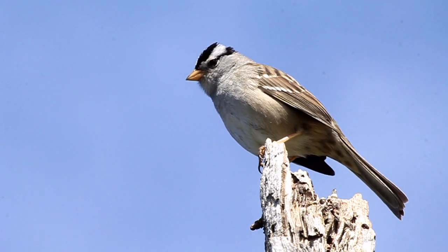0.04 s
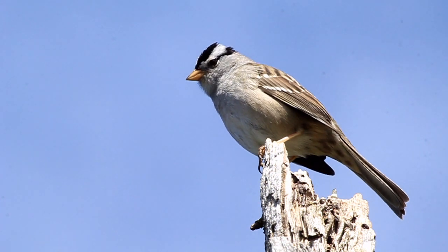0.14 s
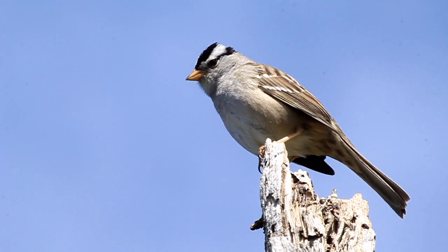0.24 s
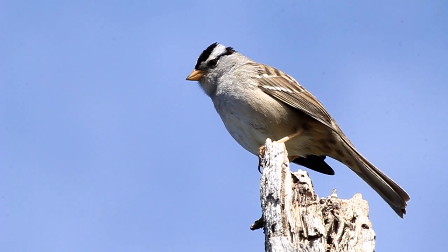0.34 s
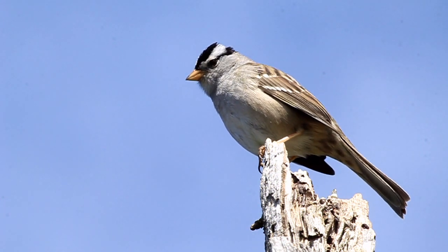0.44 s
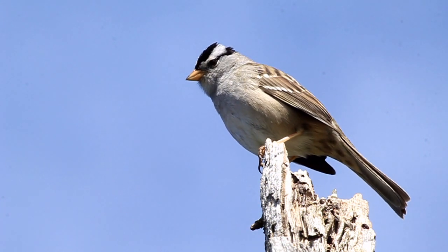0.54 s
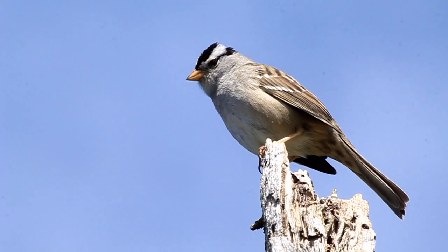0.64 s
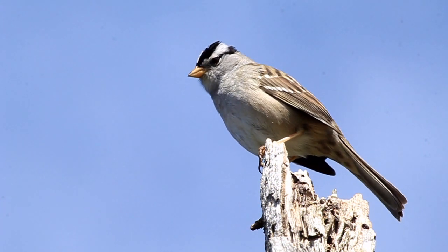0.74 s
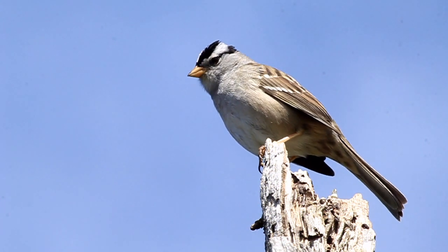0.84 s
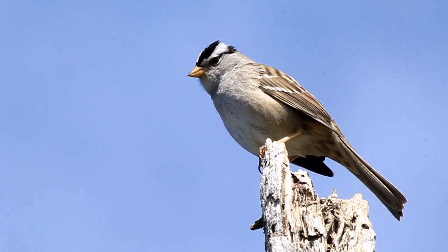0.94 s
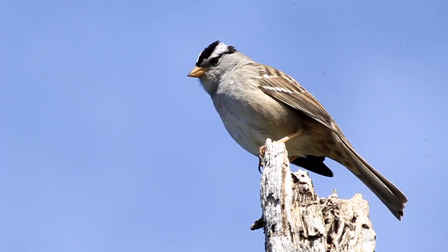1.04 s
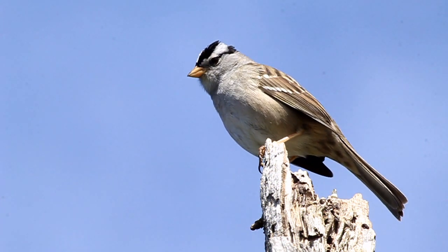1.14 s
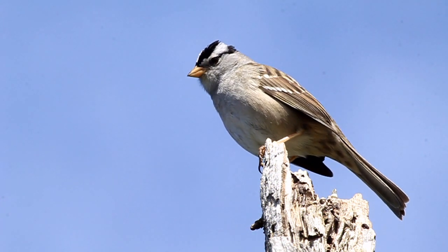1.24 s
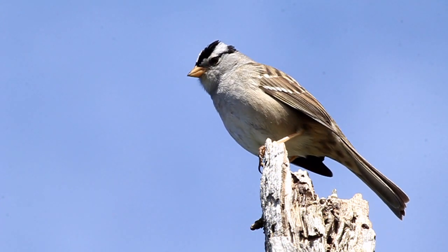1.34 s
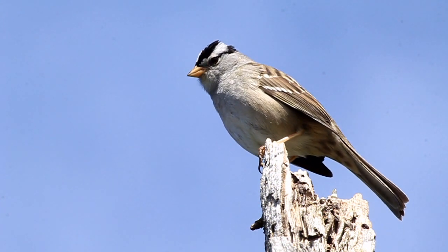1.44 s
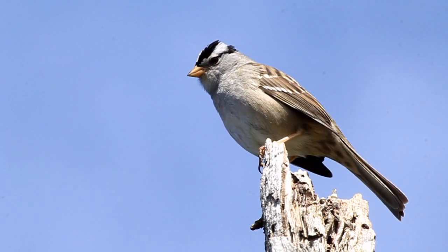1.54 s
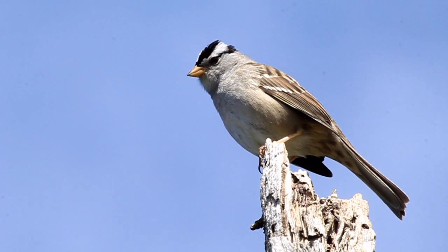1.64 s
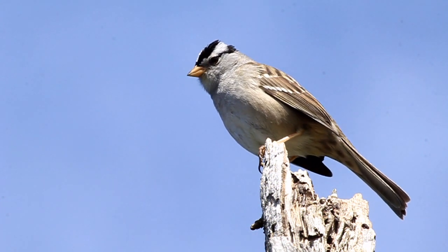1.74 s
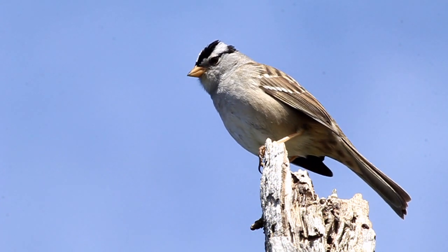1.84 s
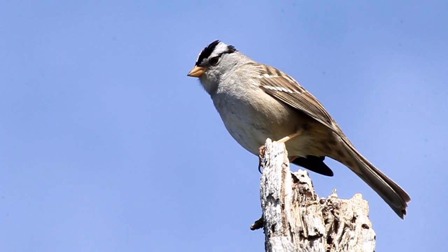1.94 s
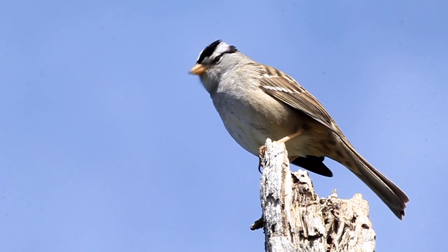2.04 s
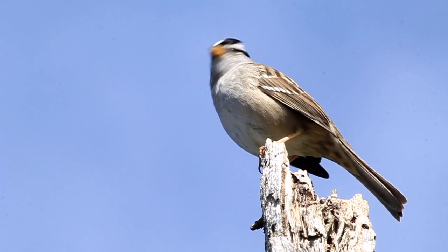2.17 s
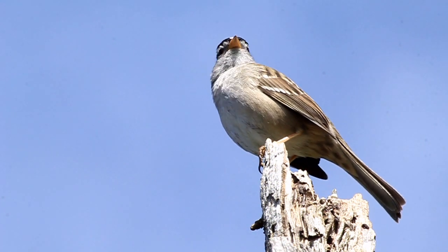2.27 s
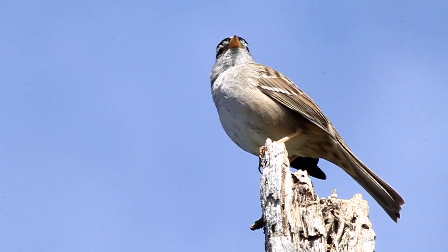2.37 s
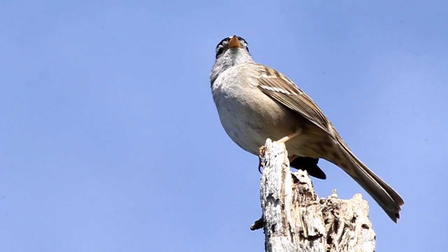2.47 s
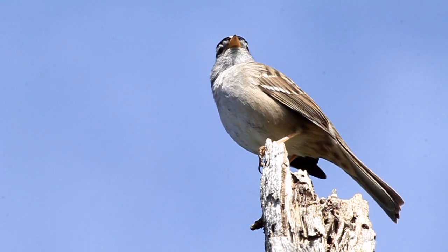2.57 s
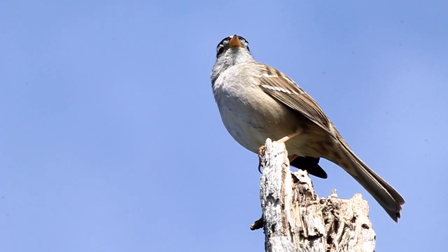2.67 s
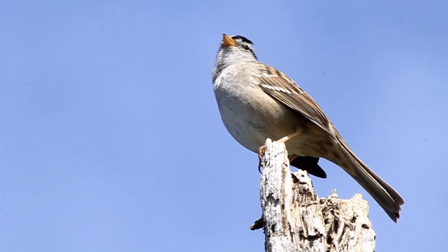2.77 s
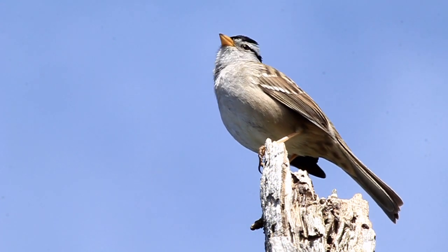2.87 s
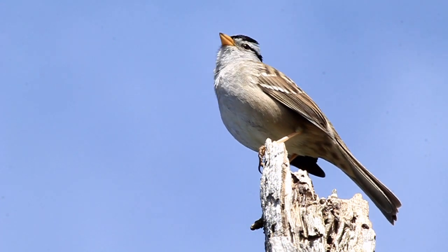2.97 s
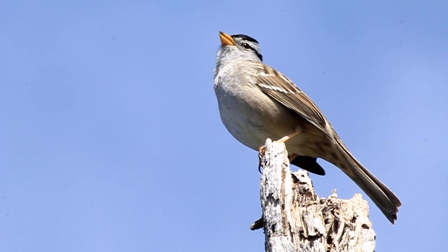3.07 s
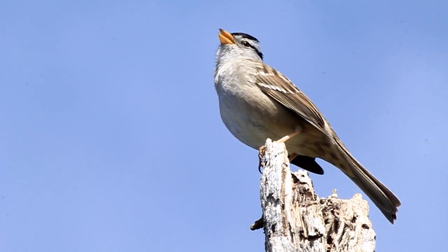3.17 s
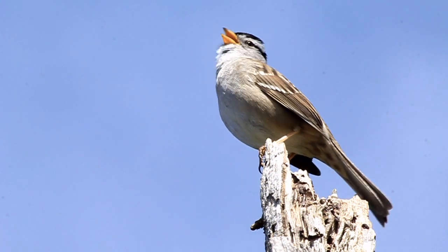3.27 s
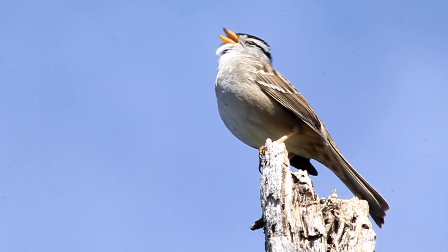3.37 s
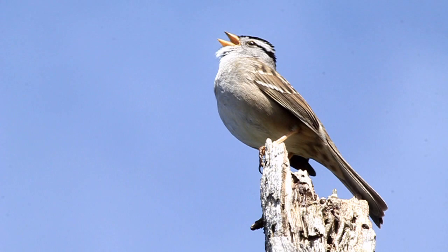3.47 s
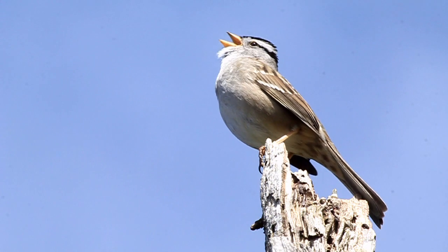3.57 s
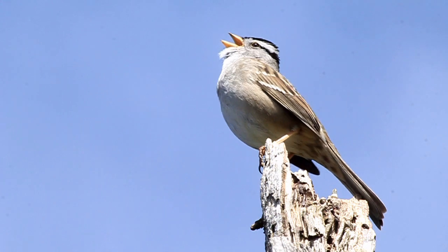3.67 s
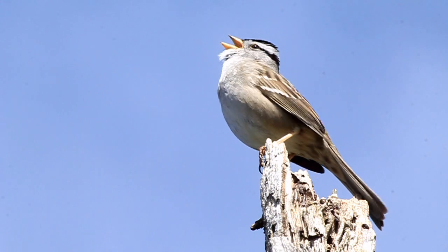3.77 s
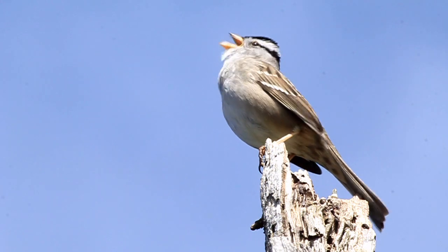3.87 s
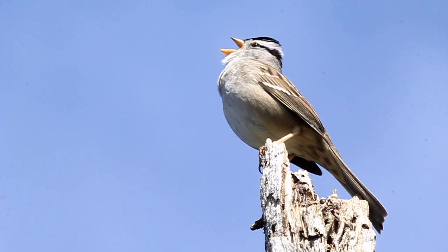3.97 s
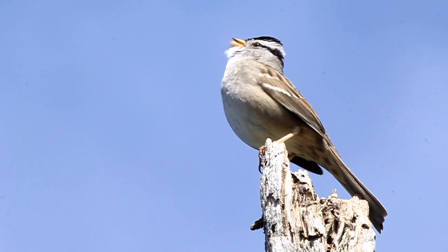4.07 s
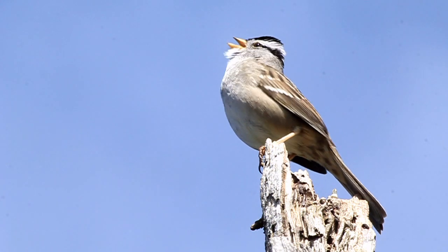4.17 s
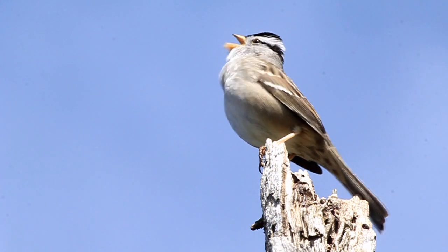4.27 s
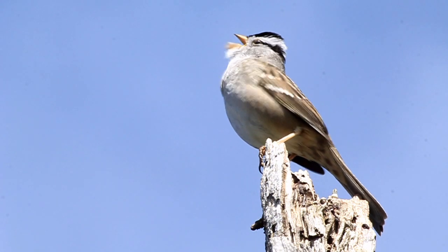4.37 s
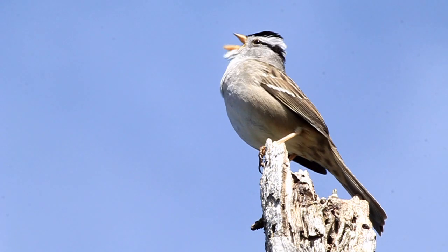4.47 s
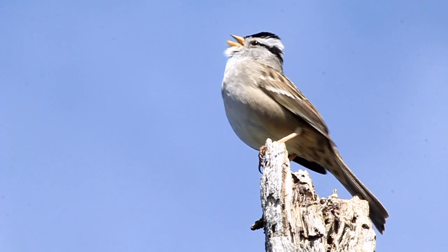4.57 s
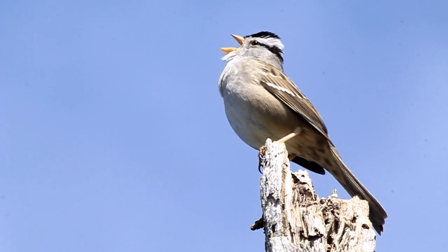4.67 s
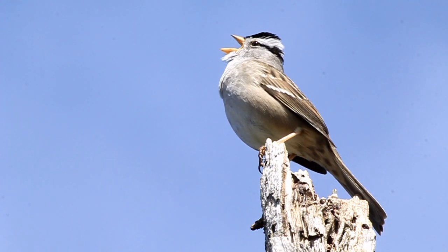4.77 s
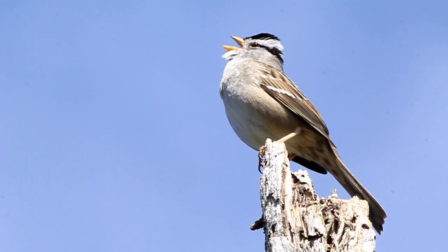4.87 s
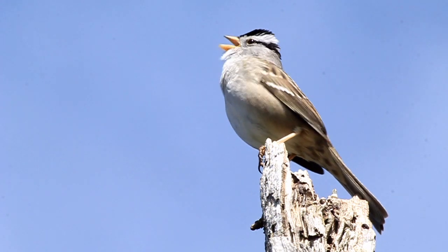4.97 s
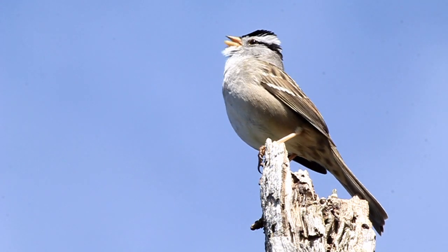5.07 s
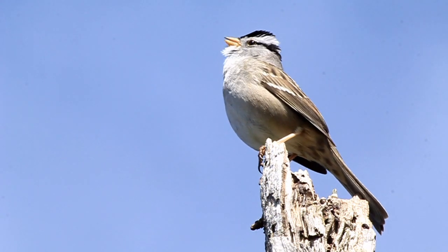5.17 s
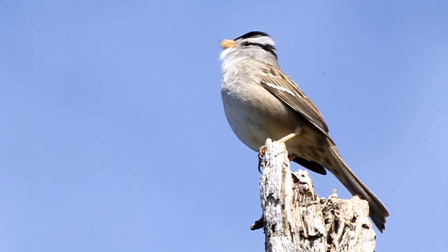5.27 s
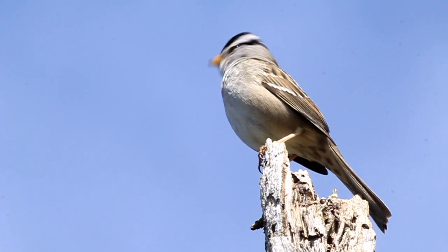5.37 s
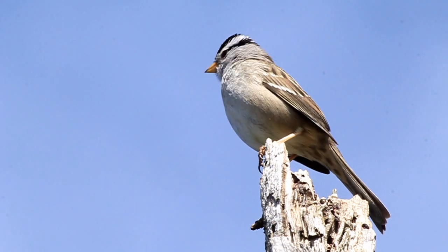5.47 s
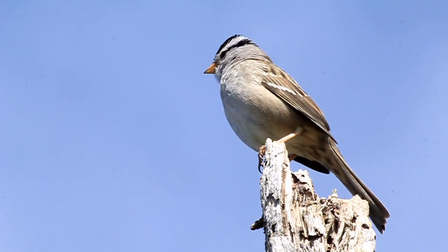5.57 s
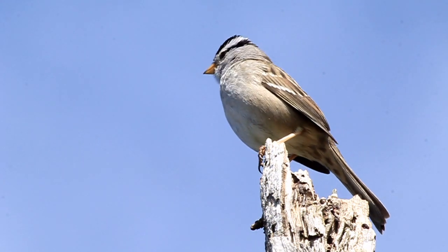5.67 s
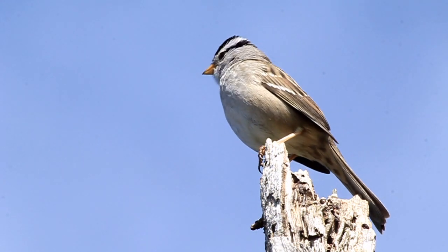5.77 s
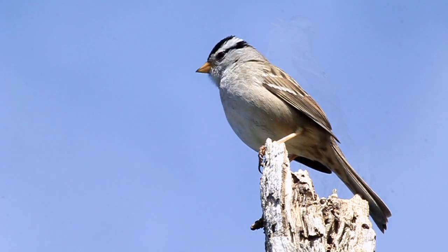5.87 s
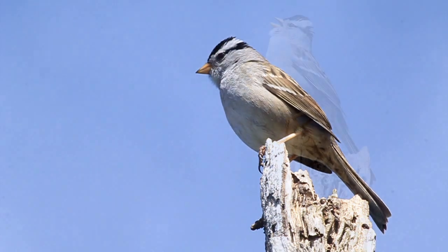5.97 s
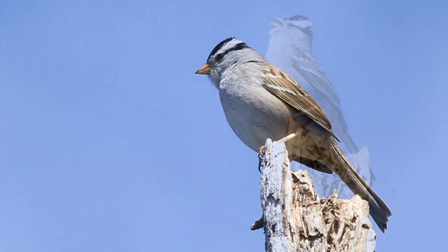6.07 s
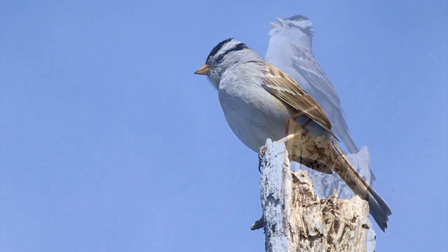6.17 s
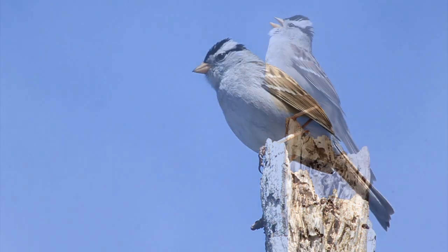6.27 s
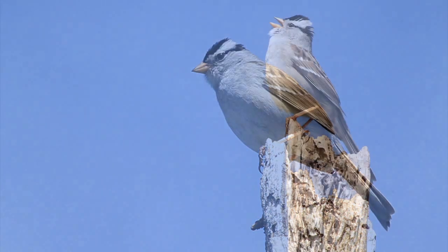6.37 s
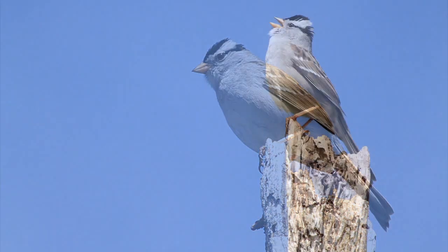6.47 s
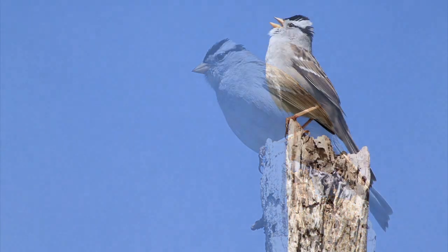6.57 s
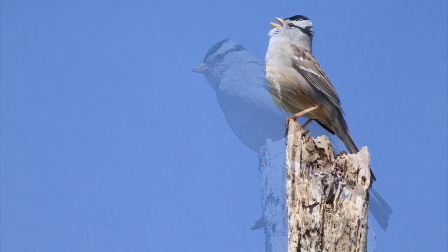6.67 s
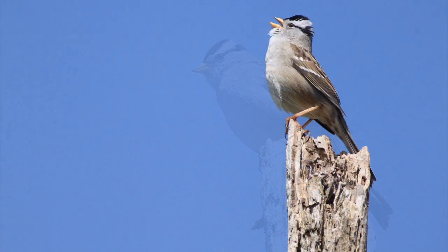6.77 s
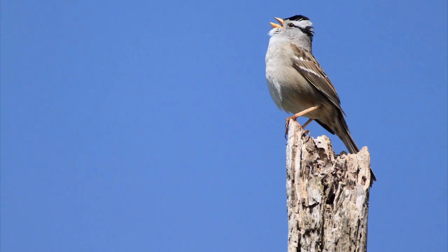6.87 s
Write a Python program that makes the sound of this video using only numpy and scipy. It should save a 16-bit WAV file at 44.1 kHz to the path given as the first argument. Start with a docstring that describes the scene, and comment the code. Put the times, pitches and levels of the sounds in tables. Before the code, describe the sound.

A quiet open-air background of low rumble, even hiss and faraway birdsong comes first. Then one white-crowned sparrow, clear and centred, gives a two-second song: a pure sharp whistle, rapid bending notes with little rattles, a sinking raspy buzz and a long falling whistle. It stops, leaving soft distant whistles and chirps, blurred by the scrub. The close bird is much louder than everything else.

```python
"""Sparrow song in open scrub

A sparrow sings one song: a held whistle, slurs linked by trills, a buzz and a long falling note.
Its voice is a gliding sine with weak overtones, shaped by resonances of throat and beak; fast strokes
add rasping noise. Fainter whistles, slurs, arches, buzzes and random chirps come from farther birds.
Decaying noise echoes scatter every note; filtered noise and a wavering sine make a low outdoor
rumble, and brighter filtered noise a soft, even hiss."""
import sys
import numpy as np
from scipy import signal
from scipy.fft import rfft, irfft, next_fast_len
from scipy.io import wavfile
from scipy.ndimage import uniform_filter1d, map_coordinates

SR = 44100
rng = np.random.default_rng(int(sys.argv[2]) if len(sys.argv) > 2 else 0)


def unload_audio(sound):
    """Save the sound as a 16-bit wav file, at the path given as the first command line argument."""
    columns = np.transpose(np.atleast_2d(sound))
    # keep every value between -1 and 1, then stretch to whole-number steps
    steps = np.round(np.clip(columns, -1, 1) * 32767)
    wavfile.write(sys.argv[1], SR, steps.astype(np.int16))


N = 305157  # samples in the scene


def amp(db):
    """Logarithmic level: decibels to amplitude gain."""
    return 10 ** (np.asarray(db) / 20)


def unit(x):
    """Normalization: scale to an rms of 1."""
    return x / np.sqrt(np.mean(x ** 2) + 1e-20)


def along(points, hz):
    """Logarithmic frequency scale: (frequency [Hz], value) points are joined along it."""
    f, v = np.transpose(points)
    return np.interp(np.log(hz + 1), np.log(f + 1), v)


def wobble(rate, size):
    """Band-limited fluctuation: a smooth curve through `rate` random knots a second."""
    knots = rng.standard_normal(int(size * rate / SR) + 4)
    return map_coordinates(knots, [np.arange(size) * rate / SR])


def span(length):
    """Normalized time: a note of `length` seconds runs from -1 to 1."""
    return np.linspace(-1, 1, int(length * SR))


def gesture(rows, size=90):
    """Smooth motor control: start time and gently rounded per-sample curves of a note's columns."""
    s, *cols = np.transpose(rows)
    s = np.sort(s)
    t = s[0] + np.arange(max(int((s[-1] - s[0]) * SR), size)) / SR
    curves = [uniform_filter1d(np.interp(t, s, c), size, mode="nearest") for c in cols]
    return s[0], curves


def gate(size, attack, release):
    """Amplitude envelope: straight attack, hold and straight release."""
    t = np.arange(size) / SR
    return np.minimum(t / attack, 1) * np.minimum(t[::-1] / release, 1)


def level(rows):
    """Level contour: gain over the whole scene from (time [s], level [dB]) rows."""
    return amp(np.interp(np.arange(N) / SR, *np.transpose(rows)))


def add(track, s, sound):
    """Superposition: mix a sound into the track at time s."""
    at = round(s * SR) + np.arange(len(sound))
    inside = (at >= 0) & (at < N)
    track[at[inside]] += sound[inside]


def filtered(x, response):
    """Linear filtering: the spectrum of x is multiplied by a response of frequency."""
    m = next_fast_len(N + SR // 2)
    return irfft(rfft(x, m) * response(np.fft.rfftfreq(m, 1 / SR)), m)[..., :N]


def noise(spectrum):
    """Spectral shaping: white noise coloured by (frequency [Hz], level [dB]) rows, at rms 1."""
    return unit(filtered(rng.standard_normal(N), lambda hz: amp(along(spectrum, hz))))


# Spectral shape of the low outdoor rumble: (frequency [Hz], relative level [dB])
RUMBLE_SPECTRUM = [(15, -41), (25, -13.5), (70, -9), (122, -1), (174, -5.5), (208, -9.5), (244, -9.5),
                   (414, -14), (477, -14), (667, -17), (716, -16), (1450, -27), (1700, -33), (2210, -44.5),
                   (3740, -120)]
# Level of the rumble, which dips briefly: (time [s], level [dB])
RUMBLE_LEVEL = [(0, -49), (3.8, -49.5), (4.7, -51.5), (5.2, -48.5), (6.85, -48.5)]
# Level of the drone in the rumble before its trim: (time [s], relative level [dB])
DRONE_LEVEL = [(0, -49), (.5, -43), (1.7, -40.5), (2.4, -48), (6.8, -45)]


def rumble(drone_trim_db=-7, side_db=-14, lean_db=.45):
    """Partial interchannel coherence: a weak side noise widens the rumble; it leans to the left."""
    wander = 3.4 * wobble(8, size=N)  # phase [rad]
    drone = np.sqrt(2) * np.sin(2 * np.pi * 82.5 * np.arange(N) / SR + wander)
    mid = level(RUMBLE_LEVEL) * noise(RUMBLE_SPECTRUM)
    mid = mid + amp(drone_trim_db) * level(DRONE_LEVEL) * drone
    side = amp(side_db) * level(RUMBLE_LEVEL) * noise(RUMBLE_SPECTRUM)
    return np.array([amp(lean_db) * (mid + side), amp(-lean_db) * (mid - side)])


# Spectral shape of the hiss: (frequency [Hz], relative level [dB])
HISS_SPECTRUM = [(700, -23), (1300, -5), (1900, 0), (3000, -4.5), (4500, -1.5), (6500, -5.5), (12600, -8.5),
                 (13200, -15), (13700, -49)]


def hiss(db=-58.5):
    """Stationary random noise: one steady signal, equal in both channels, heard in the middle."""
    return amp(db) * noise(HISS_SPECTRUM)


# Reverberation of the wider scrub: (frequency [Hz], time to decay by 60 dB [s])
SCRUB_DECAY = [(2000, 0.99), (4000, 0.89), (8000, 0.08), (15000, 0.043)]
# Colour of what the scrub returns: (frequency [Hz], gain [dB])
SCRUB_COLOUR = [(1800, -7), (3300, -3), (4600, 2), (6500, 0), (14000, -1)]


def scrub(x, early_db, late_db, early_t60=.16):
    """Diffuse scattering: nearby twigs return a quick scatter, the wider scrub a thin, long tail."""
    hz, t, z = signal.stft(rng.standard_normal(SR), SR, nperseg=256)
    decay = amp(-60 * t / along(SCRUB_DECAY, hz)[:, None])
    late = signal.istft(z * decay, SR, nperseg=256)[1][:SR]
    early = rng.standard_normal(SR) * amp(-60 * np.arange(SR) / SR / early_t60)
    # each part has unit energy before its level is set
    echo = amp(early_db) * early / np.linalg.norm(early)
    echo = echo + amp(late_db) * late / np.linalg.norm(late)
    scattered = signal.fftconvolve(x, echo)[:N]
    return x + filtered(scattered, lambda f: amp(along(SCRUB_COLOUR, f)))


# Transmission of an overtone through throat and beak: (frequency [Hz], gain [dB])
BEAK_PASS = [(4500, -23), (7500, -33), (9500, -40.5), (11500, -31), (13000, -26.5), (14400, -22.5),
             (15000, -24), (15500, -50)]


def syrinx(hz, db, jitter=0, bright_db=0, effort=0.037):
    """Source and filter: a nearly pure sine; overtones grow with loudness, coloured by the beak."""
    hz = hz * (1 + (.0006 + jitter) * wobble(1200, size=len(hz)))
    phase = 2 * np.pi * np.cumsum(hz) / SR
    overtone_db = bright_db + effort * (db + 13)
    tone = np.sin(phase)
    for k in range(2, 5):
        passed_db = along(BEAK_PASS, k * hz) - 13 * (k > 3) - 30 * (k * hz > 15200)
        below_nyquist = k * hz < SR / 2
        tone = tone + amp(overtone_db + passed_db) * below_nyquist * np.sin(k * phase)
    edges = signal.windows.tukey(len(hz), min(1, .004 * SR / len(hz)))  # 2 ms at each end
    unsteady_db = db + .15 * wobble(200, size=len(hz))
    return np.sqrt(2) * tone * edges * amp(unsteady_db)


# The throat's resonance during fast strokes: (frequency [Hz], gain [dB])
THROAT_RESONANCE = [(3000, -9.5), (4000, -2.5), (4650, 0.5), (5400, -2.5), (7500, -18)]


def strokes(hz, db, swing, cycles, rising, dip_db, bright_db=3, jitter=0.01):
    """Fixed resonance, swept source: a sawtooth pitch too fast for the throat flares as it crosses."""
    rising = np.clip(rising, .05, .95)
    saw = -signal.sawtooth(2 * np.pi * cycles, 1 - rising)
    swept = hz + swing * uniform_filter1d(saw, size=14) / 2
    loudest = (1 - rising) / 2 if rising < .5 else 1 - rising / 2  # midway along the longer sweep
    dip = dip_db * np.sin(np.pi * (cycles - loudest)) ** 2
    dip = dip + along(THROAT_RESONANCE, hz) - along(THROAT_RESONANCE, swept)
    # off the resonance the fundamental fades more than its overtones do
    return syrinx(swept, db - dip, jitter, bright_db + dip / 2)


BUZZ_STROKES_PER_S, BUZZ_SLOWING_PER_S2 = 129, 62  # first stroke rate and its loss per second


def buzz(hz, db, swing, rising=0.91, dip_db=10.0, uneven_db=0.65, lead=0.87, rasp=0.014):
    """Frequency modulation: slowing, raspy upward sweeps, uneven in width, strength and timing."""
    n = len(hz)
    rate = BUZZ_STROKES_PER_S - BUZZ_SLOWING_PER_S2 * np.arange(n) / SR
    db = db + uneven_db * wobble(110, size=n)
    swing = swing * np.exp(.15 * wobble(300, size=n))
    cycles = lead + np.cumsum(rate) / SR + .03 * wobble(90, size=n)
    return strokes(hz, db, swing, cycles, rising, dip_db, bright_db=-1.5, jitter=rasp)


# Level of a chirp in the faintest chorus before the mix: (time [s], relative level [dB])
CHORUS_LEVEL = [(0, -71), (1.5, -59), (3.2, -57), (5.3, -56), (6.85, -54)]


def chorus(count=120, pitch_hz=3050, spread=.22):
    """Random superposition: short slurs, mostly falling, from birds at the edge of hearing."""
    chirps = np.zeros(N)
    for i, (late, long, high, slope) in enumerate(rng.standard_normal((count, 4))):
        u = span(.05 * np.exp(.25 * long))
        glide = .2 * np.sign(slope - .6) * u
        hz = pitch_hz * np.exp(spread * np.clip(high, -1.3, 1.5) + glide)
        add(chirps, (i + late) * N / SR / count, syrinx(hz, -12 * u ** 2))
    return chirps * level(CHORUS_LEVEL)


# Buzzes of the farther birds before the mix:
# (start [s], length [s], start pitch [Hz], end pitch [Hz], relative level [dB])
DISTANT_BUZZES = [(1.678, 0.26, 5560, 4384, -58), (6.355, .08, 7600, 7900, -59)]


def far_buzzes(swing_hz=1000):
    """Frequency modulation with shallow dips: gliding buzzes, their strokes blurred by distance."""
    songs = np.zeros(N)
    for s, length, start_hz, end_hz, db in DISTANT_BUZZES:
        hz = np.linspace(start_hz, end_hz, int(length * SR))
        add(songs, s, buzz(hz, db, swing_hz, dip_db=5, uneven_db=2.2, rasp=.035))
    return songs


def far_note(hz, db, edge_db=10, flutter_db=3.0):
    """Propagation fluctuation: a note soft at both ends flutters on its way through the air."""
    u = np.linspace(-1, 1, len(hz))
    return syrinx(hz, db - edge_db * u ** 4 + flutter_db * wobble(40, size=len(u)))


# Slurs of the farther birds before the mix:
# (start [s], length [s], start pitch [Hz], end pitch [Hz], relative level [dB])
DISTANT_SLURS = [ (0.496, 0.11, 5270, 4170, -55), (0.715, .078, 3360, 3670, -55.5),
                 (0.865, 0.059, 5800, 4070, -52), (0.892, 0.059, 4490, 3370, -44),
                 (1.01, .075, 6000, 4650, -51.5), (1.062, .075, 4820, 4140, -47.5),
                 (1.063, 0.071, 4830, 3060, -56), (1.147, 0.087, 2880, 3500, -48),
                 (1.202, 0.064, 5650, 3900, -56.5), (1.312, 0.093, 5820, 3550, -46.5),
                 (1.439, .057, 3190, 4760, -46), (1.536, .075, 4880, 3325, -44),
                 (1.61, 0.047, 4300, 3220, -65), (2.052, .13, 4210, 3070, -47),
                 (2.147, .11, 3250, 2600, -53.5), (2.399, 0.1, 4090, 2820, -51),
                 (2.498, .08, 2340, 1790, -59), (2.526, 0.073, 3150, 2170, -62),
                 (2.653, 0.14, 2735, 1770, -57), (2.805, .16, 3330, 1833, -54.5),
                 (3.058, .066, 2505, 1910, -52), (3.226, .044, 2410, 1905, -54),
                 (3.691, 0.036, 2970, 1960, -53.5), (5.255, .046, 5370, 4300, -57),
                 (5.58, 0.089, 5480, 3750, -57.5), (5.775, .075, 4540, 3300, -57),
                 (6.19, .065, 5600, 3610, -50.5), (6.239, .11, 4170, 2825, -53),
                 (6.526, 0.053, 5800, 3750, -48), (6.648, 0.022, 3370, 4400, -48.5),
                 (6.706, .08, 5300, 3060, -49), (6.768, 0.039, 2850, 2220, -59.5), ]
FAR_SAG = .11  # a slur sags below the straight glide by this share of its span
FAR_DULL_DB_PER_HZ = 0.0082  # the high end of a distant slur arrives weaker


def far_slurs():
    """Parabolic glide and high-frequency loss: sagging slurs, weaker at their high end."""
    songs = np.zeros(N)
    for s, length, start_hz, end_hz, db in DISTANT_SLURS:
        u = span(length)
        sag = FAR_SAG * abs(end_hz - start_hz) * (1 - u ** 2)
        hz = np.linspace(start_hz, end_hz, len(u)) - sag
        add(songs, s, far_note(hz, db - FAR_DULL_DB_PER_HZ * (hz - hz.mean())))
    return songs


# Little arched notes of the farther birds before the mix:
# (start [s], top pitch [Hz], relative level [dB])
DISTANT_ARCHES = [(2.26, 3730, -64), (2.663, 4040, -60.5), (3.0, 2690, -55), (3.01, 3450, -64.5),
                  (3.16, 2610, -56.5), (5.72, 5060, -62.5)]


def far_arches(length=0.056, drop_hz=500):
    """Parabolic glide: each little note rises to its top pitch and falls back."""
    songs = np.zeros(N)
    for s, top_hz, db in DISTANT_ARCHES:
        add(songs, s, far_note(top_hz - drop_hz * span(length) ** 2, db))
    return songs


# Whistles of the farther birds:
# (start [s], loudest moment [s], end [s], start pitch [Hz], end pitch [Hz], level [dB])
DISTANT_WHISTLES = [(0, 0.636, .79, 4050, 3855, -40.5), (5.479, 5.83, 6.17, 4260, 4210, -51),
                    (6.151, 6.374, 6.6, 3600, 3645, -50.5)]
FAR_SWELL_DB = 29  # fade over a time equal to the note's length, either side of its loudest moment


def far_whistles(waver_hz=18):
    """Exponential swell and decay: held notes drift slightly in pitch while they swell and fade."""
    songs = np.zeros(N)
    for s, loudest, end, start_hz, end_hz, db in DISTANT_WHISTLES:
        t = np.arange(s, end, 1 / SR)
        hz = np.linspace(start_hz, end_hz, len(t)) + waver_hz * wobble(22, size=len(t))
        swell_db = db - FAR_SWELL_DB * np.abs(t - loudest) / (end - s)
        add(songs, s, far_note(hz, swell_db, edge_db=0.5, flutter_db=1.85))
    return songs


# Swells of the held whistle: (start [s], depth it starts from [dB], recovery time constant [s])
WHISTLE_SWELLS = [(3.217, 43.5, 0.071), (3.377, 14, .08), (3.544, 12.5, .045)]
WHISTLE_END_S, WHISTLE_HZ, WHISTLE_DB = 3.782, 3826, -14.5
SHARP_HZ, SETTLE_S = 327, .085  # the whistle starts sharp and settles on its pitch
FLAT_HZ_PER_DB = 5.5  # it goes a little flat as it swells
EASE_S, RELEASE_S = 0.016, 0.0049  # the bird eases off before each new swell; the final cut-off


def whistle(waver_hz=7):
    """Exponential relaxation: a held note swells three times, each towards the same full level."""
    start = WHISTLE_SWELLS[0][0]
    t = np.arange(start, WHISTLE_END_S, 1 / SR)
    slack_db = np.zeros(len(t))
    for s, depth, recover in WHISTLE_SWELLS:
        ease = np.clip(1 + (t - s) / EASE_S, 0, 1)
        slack_db += depth * ease * np.exp(-np.maximum(t - s, 0) / recover)
    hz = WHISTLE_HZ + SHARP_HZ * np.exp((start - t) / SETTLE_S) + FLAT_HZ_PER_DB * slack_db
    hz = hz + waver_hz * wobble(45, size=len(t))
    tone = syrinx(hz, WHISTLE_DB - slack_db, bright_db=-2.5, effort=.2)
    note = np.zeros(N)
    add(note, start, gate(len(t), EASE_S, RELEASE_S) * tone)
    return note


# The voice carries best at the throat's resonance: (pitch [Hz], level [dB])
SLUR_RESONANCE = [(2040, -46), (2250, -39.5), (2550, -34.5), (2780, -29.5), (3030, -28.5), (3350, -20),
                  (3600, -17.5), (4150, -16), (4420, -10.3), (4560, -10), (4800, -19), (5150, -14),
                  (5900, -24), (7000, -37)]


def slur(strength_db, attack, release, pitch):
    """Resonant amplification: a glide flares whenever it crosses the throat's resonance."""
    s, (hz,) = gesture(pitch)
    tone = syrinx(hz, strength_db + along(SLUR_RESONANCE, hz), bright_db=0.1, effort=0.059)
    return s, gate(len(hz), attack, release) * tone


# The sparrow's slurs, in order: a droop, a deep swoop up to a level tone, a fall, a flick out of
# a trill, an arch, a flick out of the last trill, the long closing fall:
# (strength [dB], attack [s], release [s], pitch curve of (time [s], pitch [Hz]))
SPARROW_SLURS = [ (-0.5, 0.022, 0.021, [(3.883, 3540), (3.895, 3513), (3.907, 3435), (3.937, 2620)]),
                 (-0.5, .003, 0.0012, [(3.966, 6920), (3.99, 5010), (4.006, 4430), (4.045, 3626),
                 (4.07, 2900), (4.087, 2633), (4.125, 3334), (4.155, 3576), (4.208, 3600)]),
                 (-1, 0.022, .012, [(4.288, 5280), (4.307, 4994), (4.329, 4460), (4.343, 4250),
                 (4.376, 3280)]), (-5, 0.0023, .003, [(4.397, 6550), (4.402, 4370), (4.409, 4260),
                 (4.414, 4300)]), (-2, 0.0091, 0.0028, [(4.41, 3075), (4.425, 3166), (4.463, 4510),
                 (4.473, 4860), (4.488, 4730), (4.523, 4170), (4.542, 3700), (4.57, 3240)]),
                 (-5, .001, 0.0024, [(4.997, 5190), (4.999, 4330), (5.002, 3930)]),
                 (0, 0.032, .01, [(4.996, 3850), (5.028, 3572), (5.105, 2774), (5.13, 2647), (5.18, 2310),
                 (5.265, 2024)]), ]


def slurs():
    """Continuous frequency glide: each slur follows its own pitch curve."""
    notes = np.zeros(N)
    for row in SPARROW_SLURS:
        add(notes, *slur(*row))
    return notes


# Ticks, each a quick dip in pitch: (time of the dip [s], lowest pitch [Hz], level [dB])
PITCH_TICKS = [(3.869, 6640, -36), (4.2847, 6500, -28.5)]


def ticks(length=0.0099, rise_hz=2570, edge_db=15.5):
    """Parabolic chirp: pitch dips to its lowest where the level peaks."""
    notes = np.zeros(N)
    u = span(length)
    for s, hz, db in PITCH_TICKS:
        add(notes, s - length / 2, syrinx(hz + rise_hz * u ** 2, db - edge_db * u ** 2))
    return notes


# The droop's second harmonic flares at the beak's resonance, leading into the first trill:
# (time [s], frequency [Hz], level [dB])
DROOP_OVERTONE = [(3.905, 6770, -50), (3.925, 6000, -41.5), (3.937, 5110, -20.5), (3.941, 4900, -33)]


def droop_overtone():
    """Resonant overtone: it glides down at about twice the droop's pitch, on a curve of its own."""
    note = np.zeros(N)
    s, controls = gesture(DROOP_OVERTONE)
    add(note, s, syrinx(*controls))
    return note


# Trills of falling strokes: (strokes per second [1/s],
# rows of (time [s], centre pitch [Hz], level [dB], swing from bottom to top [Hz]))
FALLING_TRILLS = [ (134, [(3.9388, 5670, -20, 3000), (3.951, 5660, -18, 2800), (3.967, 5230, -24, 2800)]),
                  (150, [(4.3775, 5330, -25, 3500), (4.384, 5200, -16.5, 2900),
                  (4.3975, 5100, -15.5, 2600)]), (120, [(4.9795, 4100, -29.5, 1796),
                  (4.99, 4210, -21, 1700), (4.997, 4120, -18, 1500)]), ]


def trills(return_share=.18, dip_db=5):
    """Sawtooth frequency modulation: long falls, with quick returns and a dip in level meanwhile."""
    notes = np.zeros(N)
    for rate, rows in FALLING_TRILLS:
        s, (hz, db, swing) = gesture(rows)
        cycles = rate * np.arange(len(hz)) / SR
        add(notes, s, strokes(hz, db, swing, cycles, return_share, dip_db))
    return notes


# The sparrow's buzz sinks and widens:
# (time [s], centre pitch [Hz], level [dB], mean swing from bottom to top [Hz])
SPARROW_BUZZ = [(4.627, 4790, -34.5, 925), (4.647, 4700, -17, 953), (4.68, 4600, -13.5, 950),
                (4.73, 4513, -10.5, 950), (4.79, 4450, -12.5, 1100), (4.84, 4180, -13.5, 1300),
                (4.87, 3950, -17, 1420), (4.917, 3716, -22, 1390)]


def sparrow_buzz():
    """Wide frequency modulation: the strokes' centre sinks while their swing widens."""
    note = np.zeros(N)
    s, controls = gesture(SPARROW_BUZZ)
    add(note, s, buzz(*controls))
    return note


# Spectral shape of the strokes' noise: (frequency [Hz], relative level [dB])
RASP_SPECTRUM = [(2500, -28), (4500, 6), (8000, 4), (10500, 3.5), (13000, -5.5), (14500, -16.5),
                 (15500, -28)]


def rasp(rough, db=-33):
    """Amplitude-modulated noise: abrupt strokes add noise in step with their own strength."""
    strength = uniform_filter1d(np.abs(rough), size=130)
    return amp(db) * strength * noise(RASP_SPECTRUM)


def sparrow():
    """Superposition: the song after the whistle, pure notes joined by rough trills and a buzz."""
    pure = slurs() + ticks() + droop_overtone()
    rough = trills() + sparrow_buzz()
    return pure + rough + rasp(rough)


def scene():
    """Direct and scattered sound: all birds lie straight ahead, the farther ones mostly more scattered."""
    farthest = amp(-6) * scrub(chorus(), early_db=-4, late_db=2.0)
    blurred = amp(-5) * scrub(far_buzzes(), early_db=1, late_db=2)
    far = amp(-0.6) * scrub(far_slurs() + far_arches(), early_db=-15, late_db=-11)
    held = scrub(far_whistles(), early_db=-20, late_db=-24)
    near = scrub(whistle(), early_db=-22, late_db=-27.5)
    near = near + scrub(sparrow(), early_db=-17.5, late_db=-23)
    return near + held + far + blurred + farthest + rumble() + hiss()


END_S, TOP_HZ = 6.856, 15500  # moment of silence and band limit


def record(dry):
    """Band limitation: a 5 ms fade ends the sound, and nothing above the limit is kept."""
    fade = np.clip((END_S - np.arange(N) / SR) / .005, 0, 1)
    return filtered(dry * fade, lambda hz: hz < TOP_HZ)


dry = scene()
out = record(dry)
unload_audio(out)
```